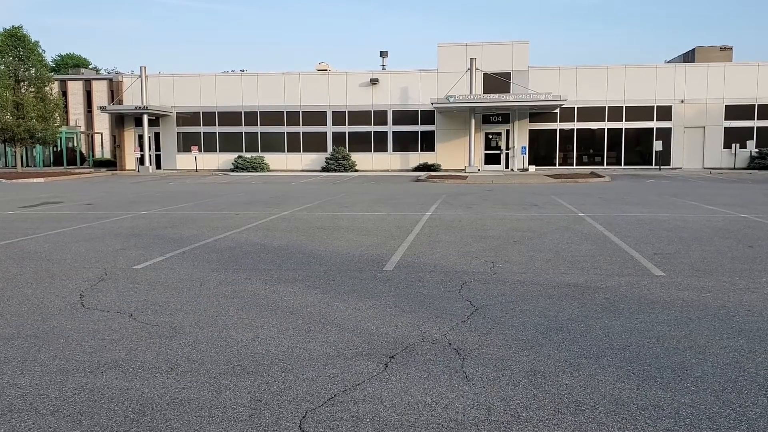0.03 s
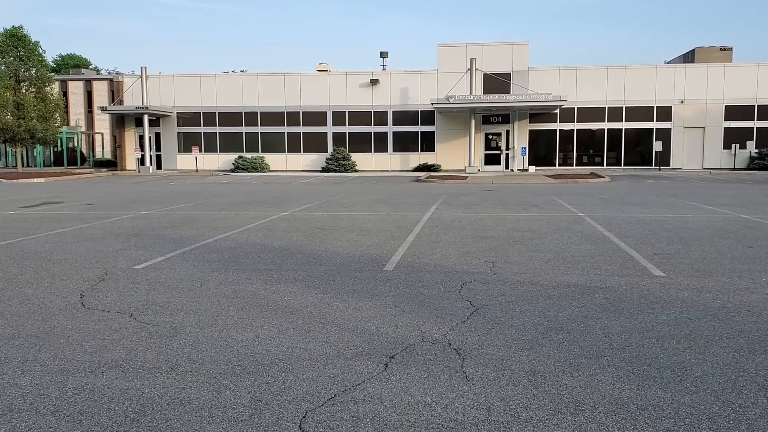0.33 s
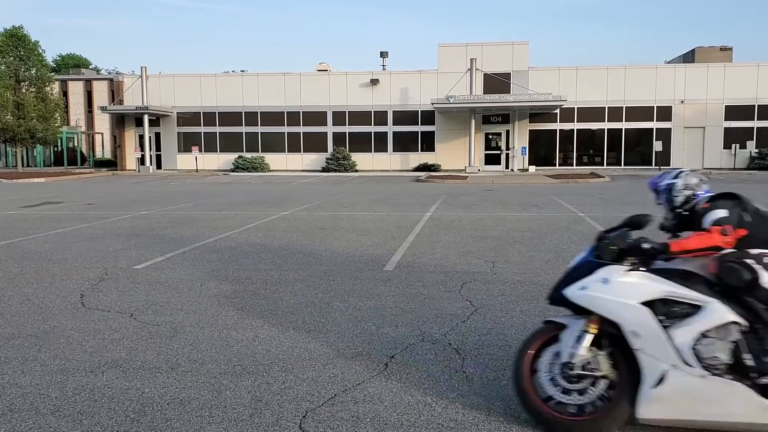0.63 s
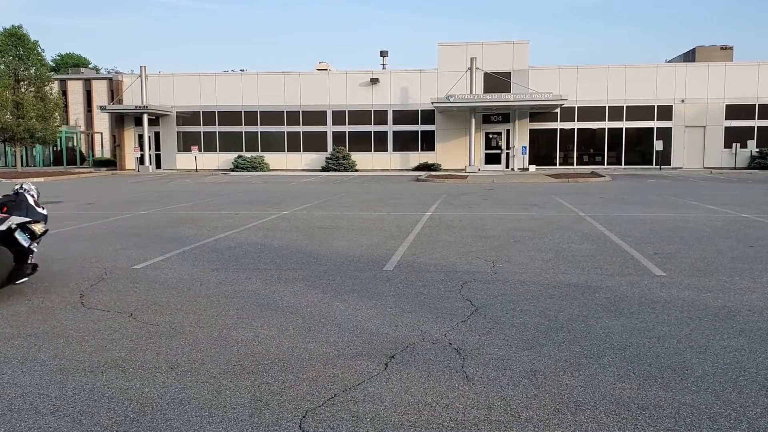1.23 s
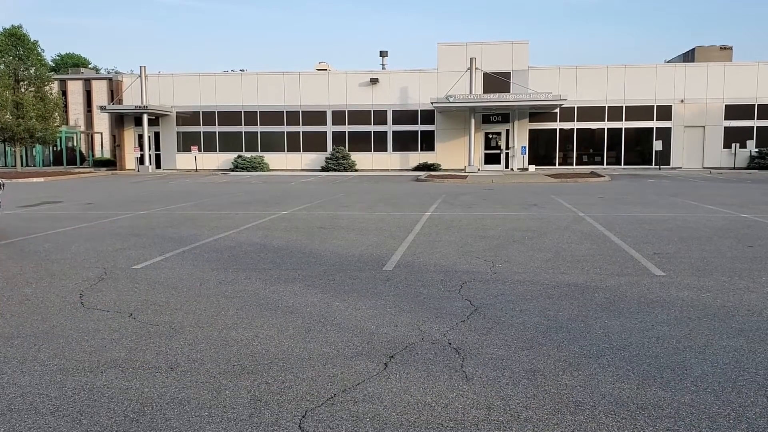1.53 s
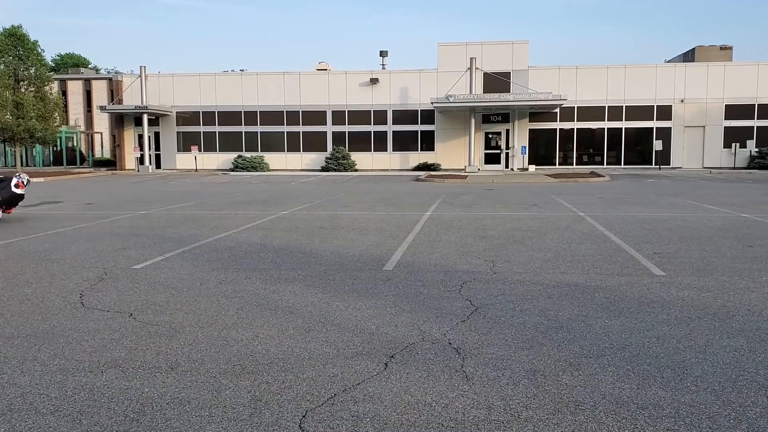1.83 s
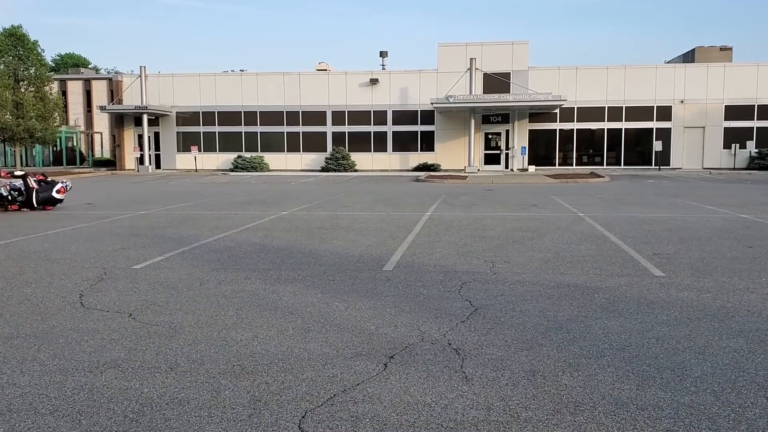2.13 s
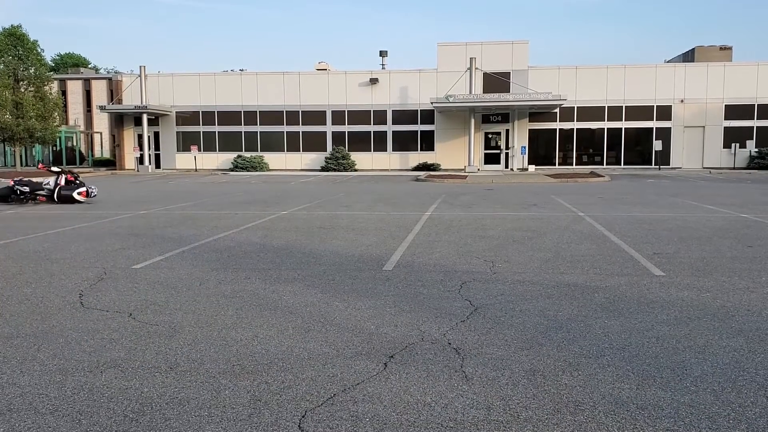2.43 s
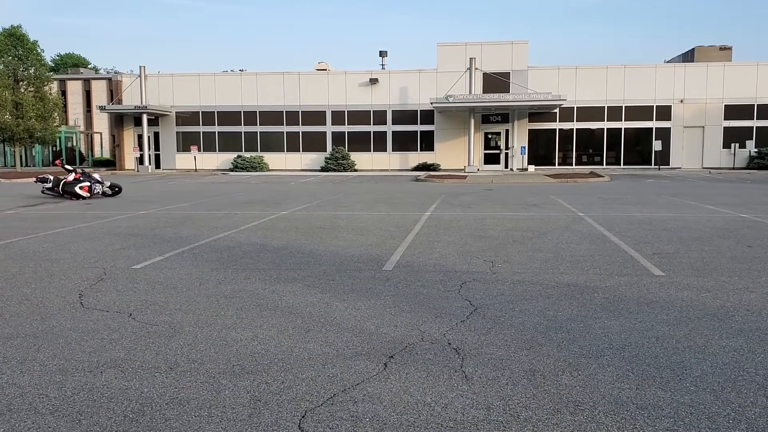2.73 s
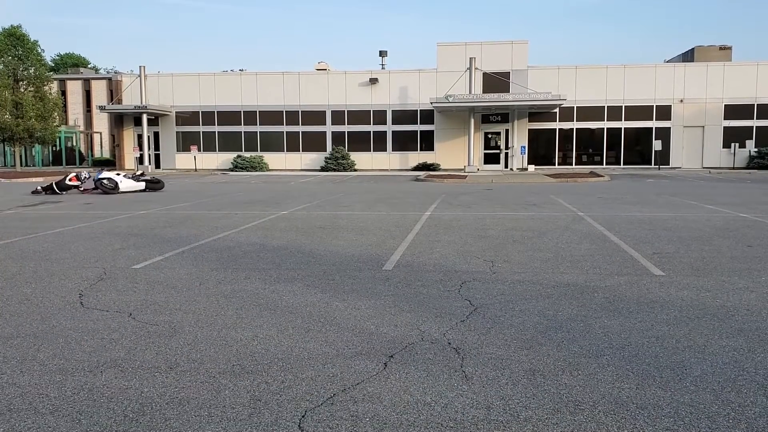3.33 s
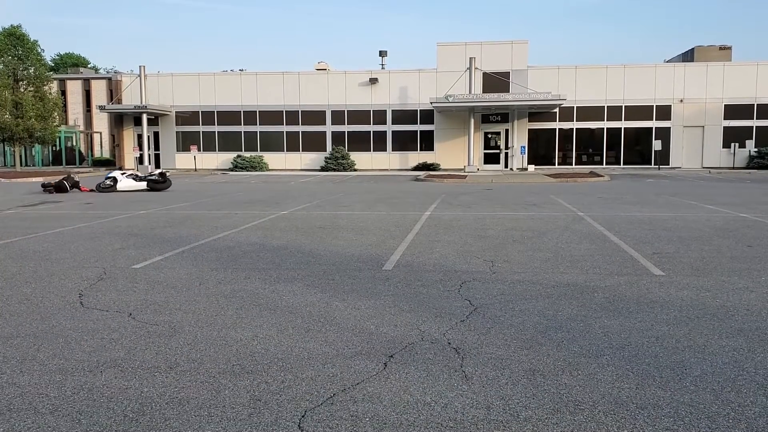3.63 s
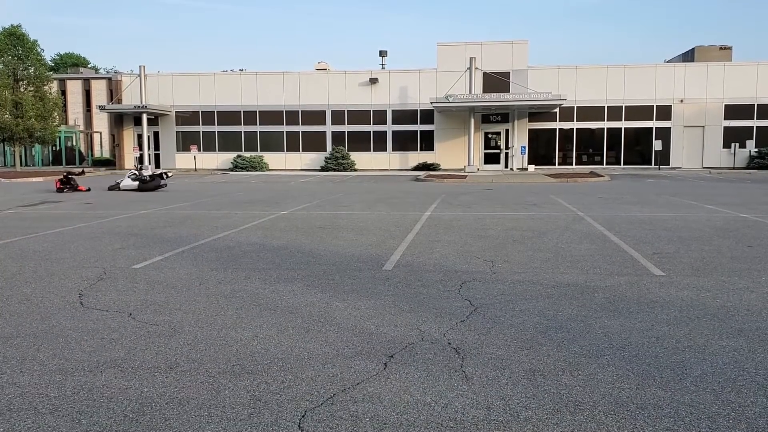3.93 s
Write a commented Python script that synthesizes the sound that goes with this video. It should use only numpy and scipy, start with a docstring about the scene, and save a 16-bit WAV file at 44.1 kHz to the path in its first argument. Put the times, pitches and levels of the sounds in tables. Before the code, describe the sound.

A motorcycle passes close from right to left across an open paved lot, its exhaust burbling. A tyre skids and squeals, the engine stalls, and the bike falls, scraping and knocking over the asphalt to rest.

```python
"""A sport motorcycle coasts close past from right to left across a paved lot and brakes hard.
Exhaust pulses give a tone and a burble over chain and tyre hiss. The tyre skids and squeals,
and the engine is dragged down to a stall, snatching at the chain. The bike falls on its side,
grinds over the asphalt with its frame ringing, and knocks to rest.
A building throws a faint echo back; a low hum hangs in the open air."""
import sys
import numpy as np
from scipy import signal
from scipy.fft import rfft, irfft
from scipy.io import wavfile
from scipy.ndimage import map_coordinates

SR = 44100
rng = np.random.default_rng(int(sys.argv[2]) if len(sys.argv) > 2 else 0)


def master(y):
    """Save y as 16-bit WAV."""
    cut = np.clip(np.atleast_2d(y).T, -1, 1)
    pcm = np.round(cut * 32767)  # scale
    wavfile.write(sys.argv[1], SR, pcm.astype(np.int16))


N = 176400
T = np.arange(N) / SR

# blows on the ground (time [s], thud [dB], crack [dB], decay [s])
LANDINGS = [(2.457,-24.5,-31,.012),(2.618,-14,-23,0.015),(2.642,-43,-12,.008),(2.736,-18,-23,0.0062),(2.747,-28,-25,0.0059),(2.926,-32,-20,0.019),(2.937,-20.5,-31,0.011),(2.966,-25.5,-41,0.018),(3.049,-22.5,-20,0.012)]


def engine():
    """Four uneven exhaust orders on a falling firing rate, plus burble and rolling hiss."""
    # (time [s], firing rate [Hz], order 1 [dB], order 2 [dB])
    firing = [(0.0, 139.3, -19, -19), (0.31, 140.8, -17.5, -17.5), (0.41, 141, -17.5, -22),
              (0.59, 139.3, -15, -21), (0.69, 142.6, -14.5, -19.5), (0.79, 140.2, -15, -22),
              (1.0, 138.6, -17.5, -19), (1.13, 138.7, -22, -23), (1.41, 137, -23, -26),
              (1.42, 134.1, -21, -21.5), (1.73, 127.8, -26, -27), (1.84, 120.6, -15.5, -23),
              (1.88, 116.1, -23, -26.5), (1.99, 108.3, -18, -27.5), (2.08, 95, -20, -30),
              (2.13, 85.5, -21.5, -74), (2.19, 74.3, -28.5, -38), (2.3, 61, -29, -33)]
    # (time [s], order 3 [dB], order 4 [dB])
    rasp = [(0,-30.5,-34.5),(.3,-30,-36),(.5,-46,-49),(.85,-54,-43),(1.15,-38,-47),(1.7,-51,-46),(2.1,-55,-62)]
    # exhaust puffs (time [s], level [dB])
    burble = [(0,-22),(.3,-26.5),(.47,-18.5),(.68,-20.5),(.9,-22),(1.15,-21),(1.6,-25.5),(1.78,-30.5),(1.87,-25),(1.97,-32.5),(2.25,-31),(2.34,-33),(2.41,-36),(2.47,-37),(2.7,-40),(3.1,-60)]
    # (frequency [Hz], gain [dB])
    burble_tone = [(20,-28),(38,-24),(55,0.5),(80,-4),(110,-1.5),(160,-4.5),(210,-7),(300,-7),(400,-16.5),(560,-21.5),(800,-39.5),(2000,-85)]
    order_shift_rad, stall_s, fade_s = 0.66, 2.24, 0.092
    phase = 2 * np.pi * np.cumsum(curve(firing)) / SR + 0.22 * drift(23)
    orders_db = [curve(firing, 2), curve(firing, 3), curve(rasp), curve(rasp, 2)]
    tone = sum(-np.sqrt(2) * amp(db) * np.cos(k * phase + order_shift_rad * (k - 1))
               for k, db in enumerate(orders_db, 1))
    tone *= 1 + 0.096 * drift(68)
    tone *= np.exp(-np.maximum(T - stall_s, 0) / fade_s)
    puffs = ears(rng.standard_normal((3, N))) * (1 + 0.35 * np.cos(phase))
    return tone + amp(curve(burble)) * unit(colour(puffs, burble_tone)) + rolling(phase)


def rolling(firing_phase):
    """Chain and tyre hiss, pulsing with the engine, brightest on the approach."""
    # (time [s], level [dB], tilt [dB/octave])
    roll = [(0,-32.5,0),(.25,-28.5,0),(.45,-25,1.1),(.65,-24,0),(.82,-26.5,0),(1,-29.5,-0.8),(1.2,-35,-0.3),(1.4,-34,-2.5),(2.1,-35.5,-3),(2.6,-63,-9)]
    # (frequency [Hz], gain [dB])
    roll_tone = [(100,7),(500,-3.5),(800,1.5),(1200,0.5),(2000,-0.5),(3100,1),(4200,-1.5),(5600,-1.5),(7000,-4.5),(7900,-12),(11000,-14.5),(15500,-13)]
    hiss = noise(roll_tone) * (1 + 0.1 * np.cos(firing_phase)) * amp(1.05 * drift(27))
    hz, t, spectra = signal.stft(hiss, SR, nperseg=512)
    octaves = np.log2(np.maximum(hz, 500) / 3500)[:, None]
    tilt_db = np.interp(t, T, curve(roll, 2)) * octaves
    return amp(curve(roll)) * signal.istft(spectra * amp(tilt_db), SR, nperseg=512)[1][:, :N]


def skid():
    """Rubber tears over asphalt with a broken, wandering squeal."""
    # (time [s], level [dB], squeal pitch [Hz])
    slip = [(1.435,-49,3352),(1.455,-25,3213),(1.51,-23,3346),(1.55,-27.5,3370),(1.585,-21.5,3870),(1.65,-24,4550),(1.75,-25,4300),(1.81,-24,4236),(1.86,-27.5,4247),(1.9,-25.5,4114),(1.95,-27.5,4230),(2.02,-23,4300),(2.1,-33,4100),(2.17,-36,4190),(2.3,-61,4200)]
    # (frequency [Hz], gain [dB])
    tear_tone = [(200,-24),(500,-17),(800,-3.5),(1020,5.5),(1200,1),(1400,4),(2000,5.5),(2700,-7),(3400,0.5),(4600,0.5),(5700,3),(7000,-2.5),(8200,-12),(10800,-11),(13000,-13),(15500,-16)]
    # squeal resonances (ratio to pitch, width [Hz], level [dB])
    modes = [(0.98,230,-6),(1.12,320,-13.5),(0.86,270,-14),(1.69,99,-18)]
    pitch_hz = curve(slip, 2)
    wander, chatter_db = 0.039, 1.93
    squeal = sum(amp(db) * unit(resonate(grit(), ratio * pitch_hz * (1 + wander * drift(28)), width_hz))
                 for ratio, width_hz, db in modes)
    tear = amp(-2) * unit(colour(grit(), tear_tone))
    slipping = (T > slip[0][0]) * (T < slip[-1][0])
    return amp(curve(slip) + chatter_db * drift(25)) * (tear + squeal) * slipping


def slide():
    """Bodywork grinds over asphalt; the scraping rings the frame."""
    # (time [s], grind [dB], scrape [dB])
    friction = [(2.1,-39,-60),(2.22,-33.5,-31.5),(2.34,-32.5,-31.5),(2.47,-31,-26),(2.6,-31,-24.5),(2.635,-23,-20),(2.72,-27,-19),(2.8,-26.5,-26),(2.9,-31,-30),(2.945,-25.5,-27.5),(3.03,-31.5,-40),(3.09,-25.5,-37),(3.14,-32,-36.5),(3.27,-32,-36.5),(3.45,-42,-47),(3.62,-44,-49),(3.76,-49.5,-63),(3.85,-48,-49),(4,-47.5,-53)]
    # dark grinding (frequency [Hz], gain [dB])
    grind_tone = [(40,-20),(120,-2),(330,-2),(470,2.5),(700,-0.5),(1000,0.5),(1400,-4),(1800,-1.5),(2300,-3),(3000,-4),(5000,-17),(9000,-45)]
    # bright scraping (frequency [Hz], gain [dB])
    scrape_tone = [(700,-24),(1100,-12),(1400,-0.5),(1800,0),(2300,-1.5),(2800,-8.5),(3500,-1.5),(4350,1.5),(5200,-6),(6900,-2.5),(8000,-14),(10000,-14.5),(12000,-14.5),(15500,-22.5)]
    # frame and fairing (frequency [Hz], width [Hz], level [dB])
    modes = [(445,40,-3),(1384,35,-1),(1590,35,-2),(1789,70,-4),(2312,20,-1),(3556,70,-2),(3742,30,0),(3988,20,3),(4320,30,3),(4480,90,0),(4780,80,-1),(5420,35,-1),(5860,45,-3)]
    judder = amp(drift(34))
    onset = np.clip((T - friction[0][0]) / 0.05, 0, 1)
    grind = amp(curve(friction)) * unit(colour(grit(), grind_tone))
    catches = grit()
    ring = unit(sum(amp(db) * resonate(catches, hz, width_hz) for hz, width_hz, db in modes))
    scrape = amp(curve(friction, 2)) * (unit(colour(grit(), scrape_tone)) + amp(-4.5) * ring)
    return onset * judder * (grind + scrape)


def knocks():
    """Each landing thuds and cracks; the brittle fairing snaps and rattles."""
    # (frequency [Hz], gain [dB]) each
    thud_tone = [(40,-10),(130,-8),(250,6),(340,11),(490,2),(750,-12),(1500,4),(3000,-1),(8000,-38)]
    crack_tone = [(300,-21),(1400,8.5),(2800,1),(4400,2.5),(6600,-1),(8200,-15),(13000,-12),(15500,-22)]
    snap_tone = [(400,-11),(1500,4.5),(3000,-3),(4400,4.5),(6600,-0.5),(8200,-4),(13000,-12.5),(15500,-8)]
    # (time [s], level [dB], decay [s])
    snaps = [(2.561,-26,.004),(2.733,-17,0.0034),(2.748,-19,0.005),(3.0501,-17,0.0031),(3.28,-33,.007),(3.43,-40,0.009),(3.675,-34.5,0.01),(3.822,-39,0.017),(3.865,-41,.012),(3.96,-34,.005)]
    thuds = blows(thud_tone, [(s, db, decay_s) for s, db, _, decay_s in LANDINGS])
    cracks = blows(crack_tone, [(s, db, decay_s) for s, _, db, decay_s in LANDINGS])
    return 0.83 * thuds + cracks + blows(snap_tone, snaps)


def tank_boom():
    """The tank rings briefly at each landing."""
    # (frequency [Hz], level [dB])
    modes = [(145,-7),(245,-9.5),(470,-4),(545,-8.5)]
    boom = np.zeros(N)
    for start_s, thud_db, _, decay_s in LANDINGS:
        ring = sum(amp(db) * np.sin(2 * np.pi * hz * (T - start_s)) for hz, db in modes)
        boom += amp(thud_db) * strike(start_s, decay_s) * ring
    return boom


def jolts():
    """Dull clunks as the stalling engine snatches at the chain."""
    # (time [s], level [dB], pitch [Hz])
    snatches = [(1.848,-19,285.3),(1.863,-17,334.7),(2.095,-5.5,295),(2.109,-9.5,109.1),(2.119,-14.5,336),(2.175,-16.5,274),(2.239,-20.5,238)]
    clunks = sum(amp(db) * strike(s, decay_s=0.0087) * np.sin(2 * np.pi * hz * (T - s))
                 for s, db, hz in snatches)
    return clunks * (1 + 0.33 * drift(199.7))


def pass_by(x):
    """The bearing delays one ear; the head shadows mostly the treble."""
    # (time [s], left ear lag [ms], treble left minus right [dB])
    bearing = [(0,.45,-5.3),(.25,.43,-5.3),(.45,.36,-6.2),(.65,.18,-4.1),(.85,-.04,-1.8),(1.05,-.18,-1.4),(1.3,-.23,-1.2),(1.65,-.245,-.8),(2.45,-.21,-1.3),(2.75,-.2,-2.3),(3.15,-.165,-1)]
    shadow_hz, bass_share = 970, 0.19
    lag_ms, side_db = curve(bearing), curve(bearing, 2)
    heard = np.array([delay(x[0], lag_ms / 2), delay(x[1], -lag_ms / 2)])
    bass = signal.sosfiltfilt(signal.butter(2, shadow_hz, fs=SR, output="sos"), heard)
    ear_db = np.array([side_db, -side_db]) / 2
    return bass * amp(bass_share * ear_db) + (heard - bass) * amp(ear_db)


def near_reflections(x):
    """Quick reflections off ground and bike colour the treble raggedly."""
    # (frequency [Hz], gain [dB])
    tone = [(60,-30),(400,-24),(1200,-9),(12000,-7)]
    taps = echo_taps(rng.standard_normal(N), tone, gap_s=0.001, decay_s=0.006)
    return signal.fftconvolve(x, taps[None, :SR // 10], axes=1)[:, :N]


def building_echo(x):
    """Faint tail off the building, different at each ear."""
    # (frequency [Hz], gain [dB])
    tone = [(60,-29.5),(600,-15.5),(5000,-14),(12000,-6)]
    taps = echo_taps(rng.standard_normal((2, N)), tone, gap_s=0.012, decay_s=0.078)
    return signal.fftconvolve(x, taps[:, :SR], axes=1)[:, :N]


def background():
    """Low wavering hum in open air."""
    # (frequency [Hz], level [dB])
    partials = [(60.2,-47),(75.3,-49),(51,-51),(110,-58)]
    # (frequency [Hz], gain [dB])
    air_tone = [(20,-26),(60,-1),(120,-4.5),(200,-10.5),(310,-14.5),(420,-14),(560,-21.5),(690,-12.5),(900,-26),(2000,-31.5),(5000,-33.5),(8000,-59),(15000,-60)]
    hum = sum(np.sqrt(2) * amp(db) * np.sin(2 * np.pi * hz * T + 0.3 * drift(1.6)) for hz, db in partials)
    return hum + amp(-42.5) * noise(air_tone)


def grit(clicks_per_s=5000, spread_db=2):
    """Stones catch and let go: dense clicks of uneven size."""
    size = amp(spread_db * np.minimum(rng.exponential(1, (3, N)), 4))
    return ears(size * rng.standard_normal((3, N)) * (rng.random((3, N)) < clicks_per_s / SR))


def ears(draws):
    """One direct signal plus a scattered one for each ear."""
    # (frequency [Hz], level against direct [dB])
    scatter = [(60,-13),(250,-14),(600,-6),(1500,-3.5),(5000,-2),(12000,2)]
    return unit(draws[0] + colour(draws[1:], scatter))


def blows(tone, rows):
    """Decaying noise bursts of one colour."""
    return noise(tone) * sum(amp(db) * strike(s, decay_s) for s, db, decay_s in rows)


def strike(start_s, decay_s, rise_s=0.00053):
    """Envelope of a blow."""
    t = np.maximum(T - start_s, 0)
    return np.minimum(t / rise_s, 1) * np.exp(-t / decay_s)


def echo_taps(white, tone, gap_s, decay_s):
    """Impulse response: a gap, then decaying coloured noise."""
    decay = np.exp(-T / decay_s) * (T > gap_s)
    return colour(white, tone) * decay / np.linalg.norm(decay)


def resonate(x, hz, width_hz):
    """Resonance that follows a pitch."""
    carrier = np.exp(2j * np.pi * np.cumsum(hz * np.ones(N)) / SR)
    pole = np.exp(-np.pi * width_hz / SR)
    return 2 * (carrier * signal.lfilter([1 - pole], [1, -pole], x / carrier + 1e-18)).real


def noise(tone):
    """Coloured stereo noise, rms 1."""
    return unit(colour(ears(rng.standard_normal((3, N))), tone))


def drift(cutoff_hz):
    """Low-passed random motion, rms 1."""
    rolloff = 1 + (np.fft.rfftfreq(N, 1 / SR) / cutoff_hz) ** 4
    return unit(irfft(rfft(rng.standard_normal(N)) / rolloff, N))


def colour(x, tone):
    """Filter by (frequency [Hz], gain [dB]) points."""
    hz, db = np.transpose(tone)
    gain_db = np.interp(np.log(np.fft.rfftfreq(N, 1 / SR) + 1), np.log(hz), db)
    return irfft(rfft(x) * amp(gain_db), N)


def delay(x, ms):
    """Time-varying delay."""
    return map_coordinates(x, [np.arange(N) - ms * SR / 1000], order=3)


def curve(table, column=1):
    """Table column over time."""
    rows = np.array(table, float)
    return np.interp(T, rows[:, 0], rows[:, column])


def amp(db):
    """Decibels to gain."""
    return 10 ** (np.asarray(db) / 20)


def unit(x):
    """Scale to rms 1."""
    return x / np.sqrt(np.mean(x ** 2) + 1e-20)


def scene():
    """The bike passes, skids and falls in the open lot."""
    bike = engine() + skid() + slide() + knocks() + tank_boom() + jolts()
    bike += near_reflections(bike)
    return pass_by(bike) + building_echo(bike) + background()


def record(dry):
    """Round off the highest peaks, then limit the band."""
    ceiling, edge_hz = 0.85, 15850
    rounded = dry / (1 + (dry / ceiling) ** 6) ** (1 / 6)
    lowpass = signal.firwin(511, edge_hz, window=("kaiser", 9), fs=SR)
    return signal.oaconvolve(rounded, lowpass[None], "same")


dry = scene()
out = record(dry)
master(out)
```